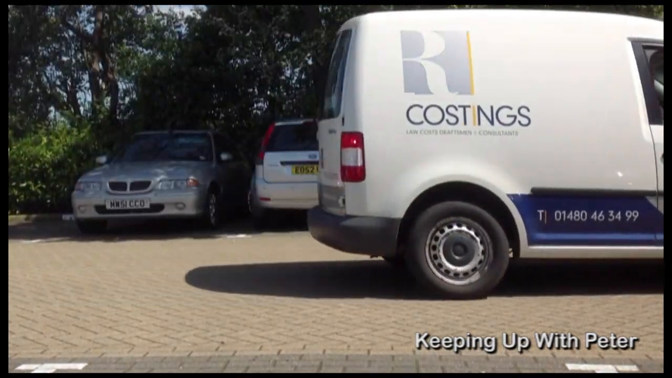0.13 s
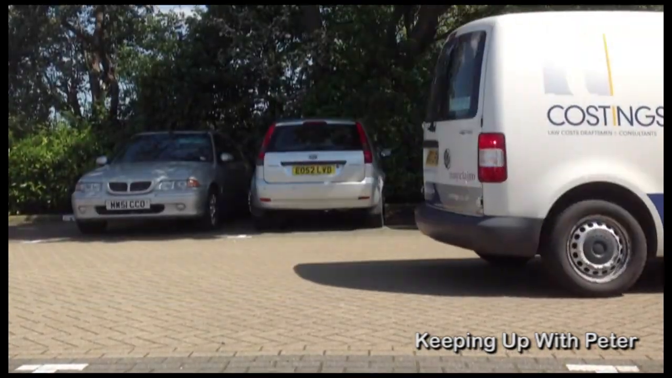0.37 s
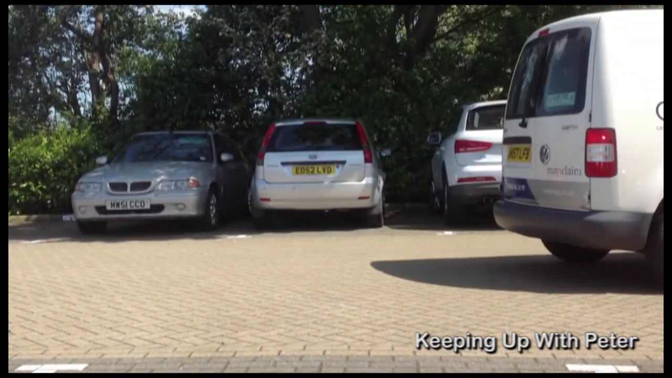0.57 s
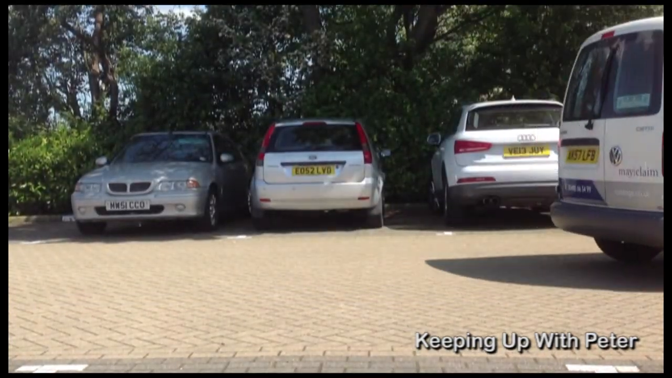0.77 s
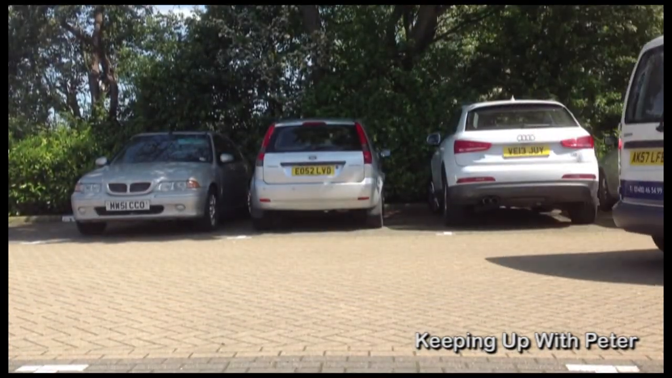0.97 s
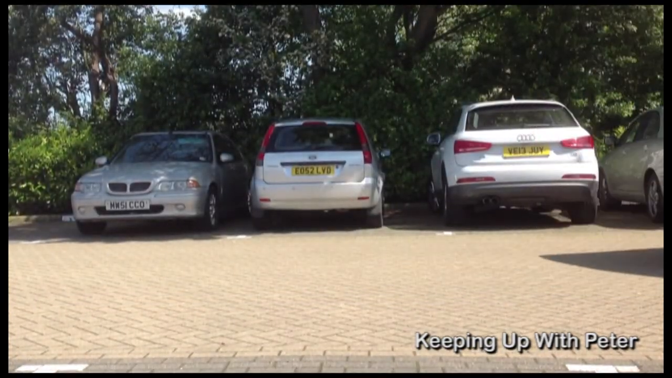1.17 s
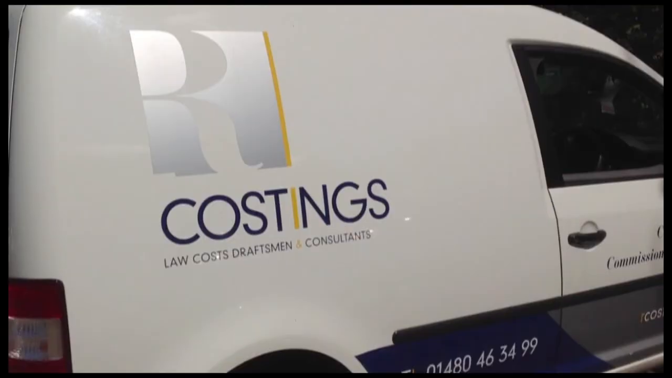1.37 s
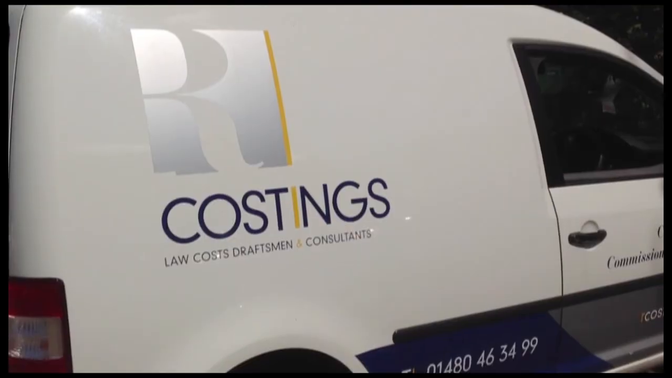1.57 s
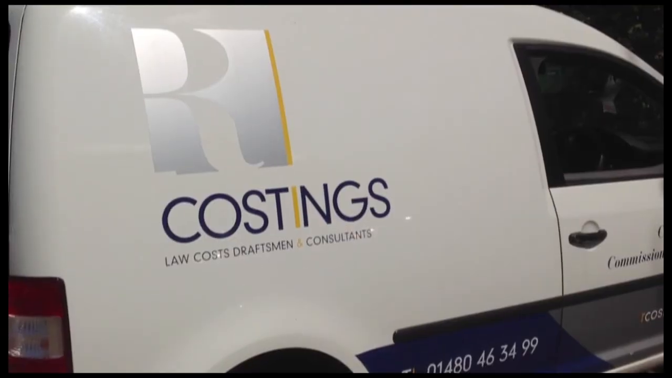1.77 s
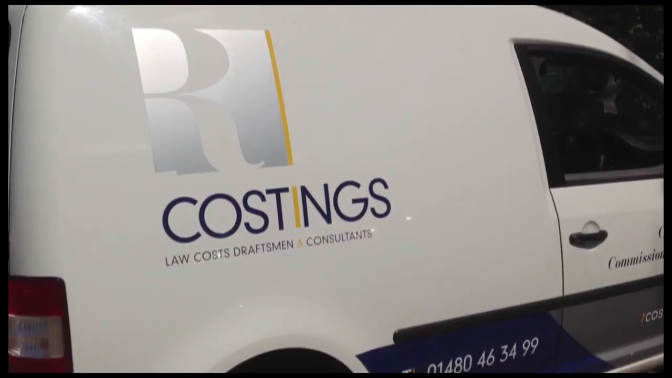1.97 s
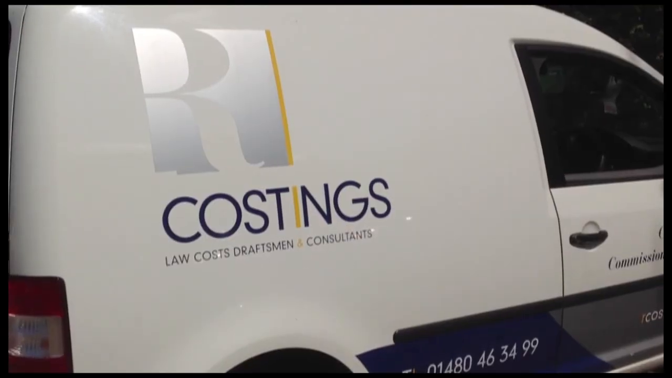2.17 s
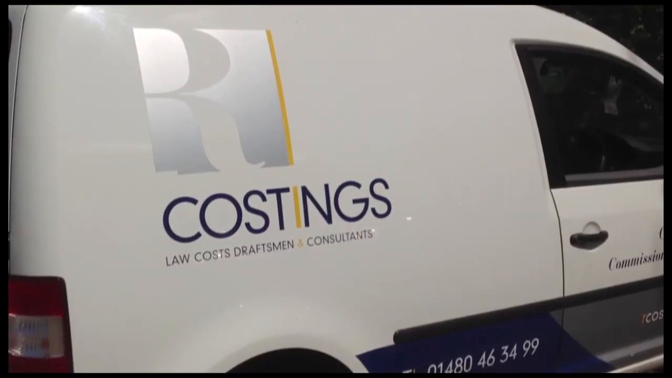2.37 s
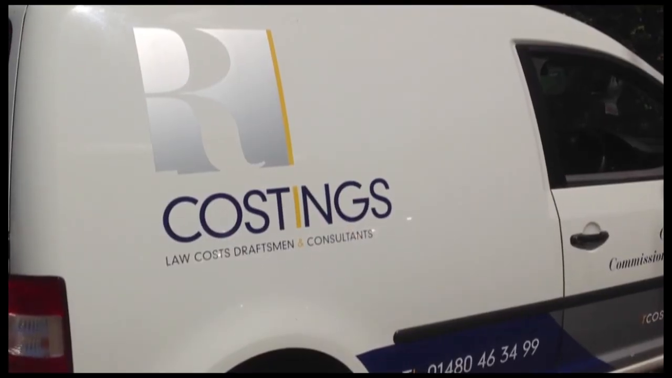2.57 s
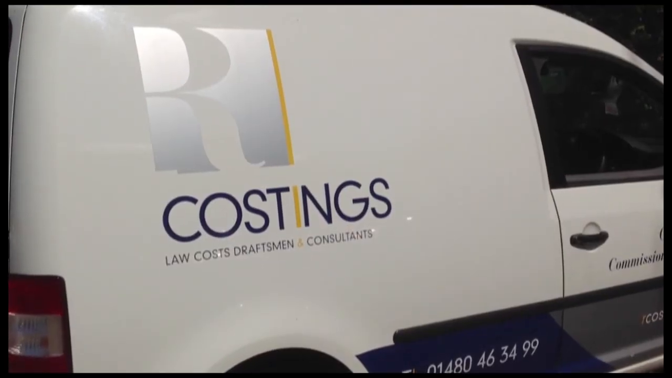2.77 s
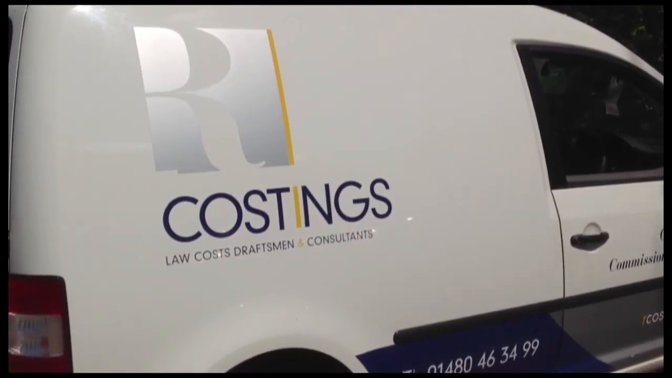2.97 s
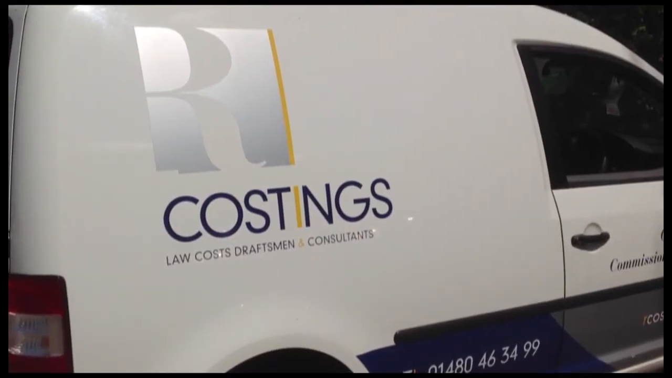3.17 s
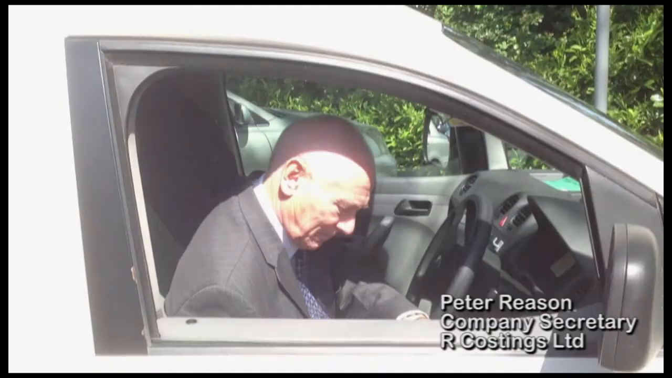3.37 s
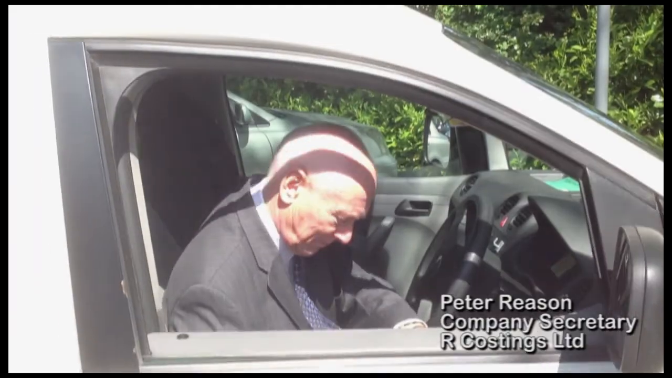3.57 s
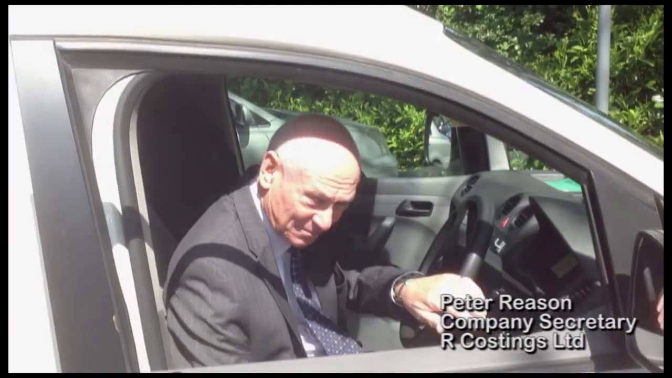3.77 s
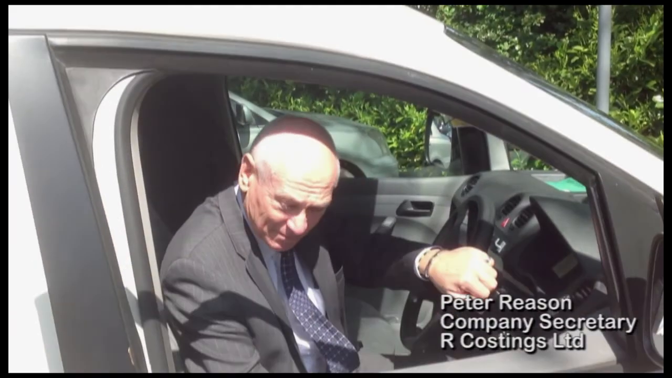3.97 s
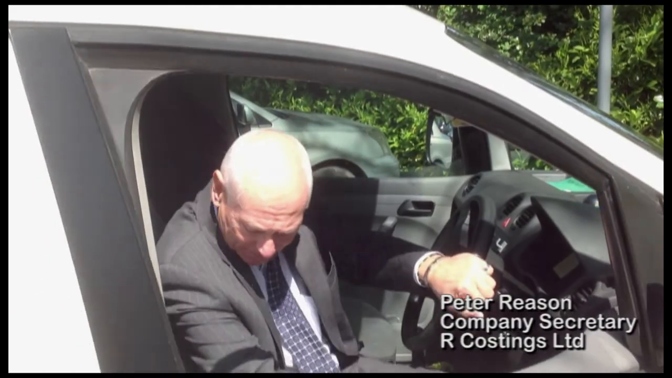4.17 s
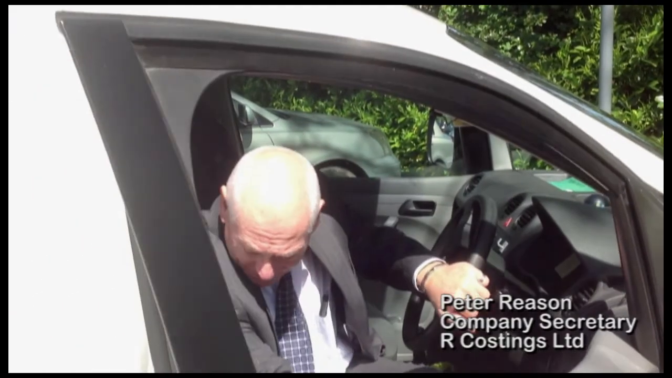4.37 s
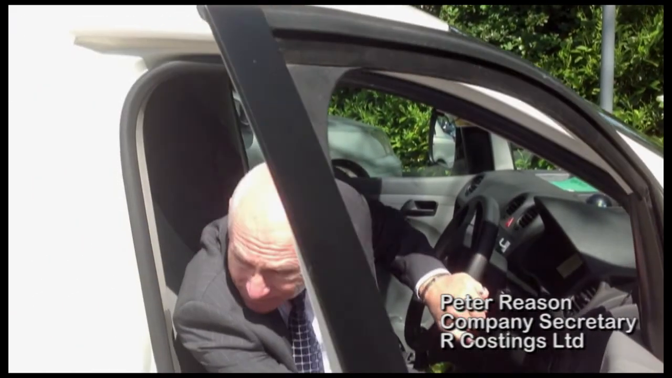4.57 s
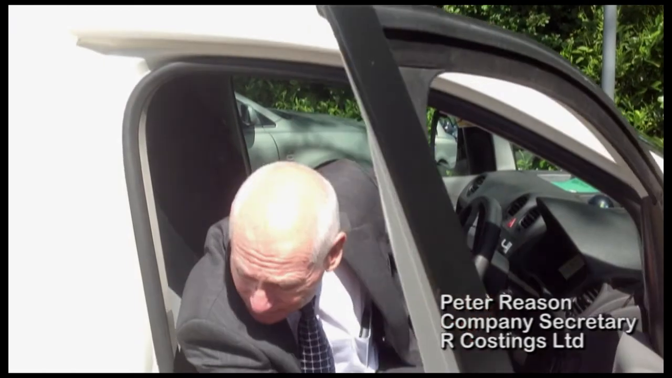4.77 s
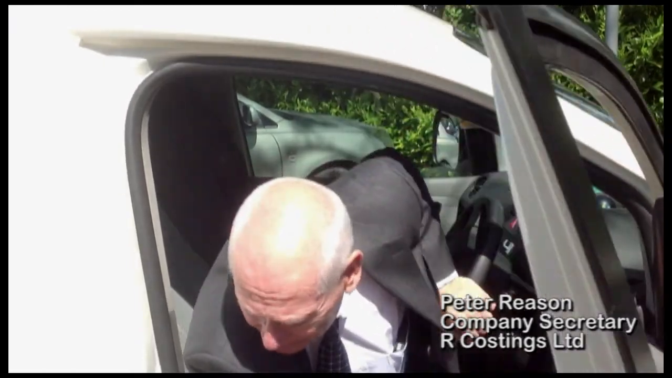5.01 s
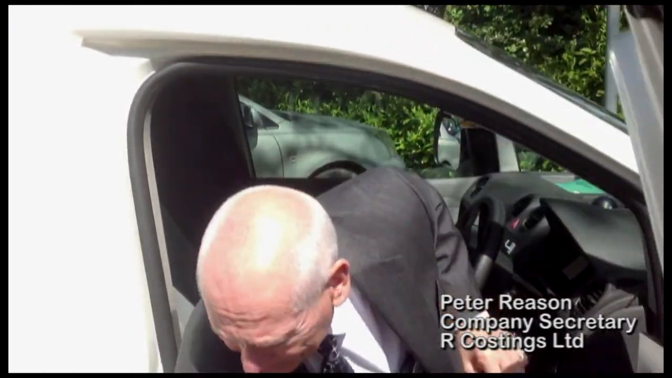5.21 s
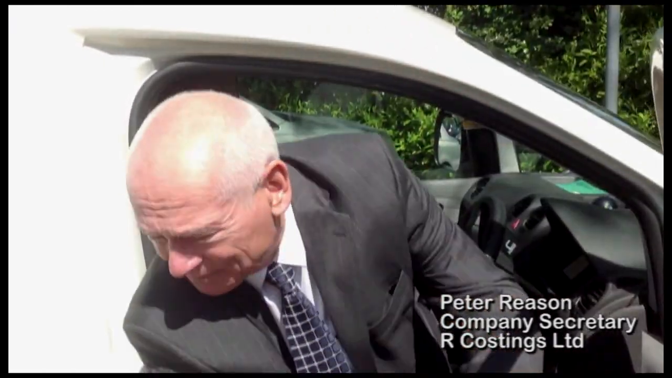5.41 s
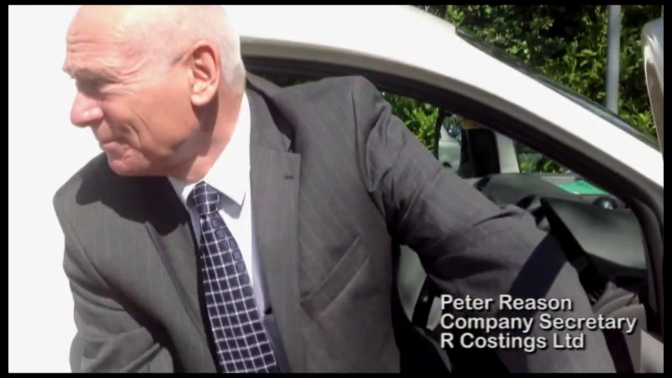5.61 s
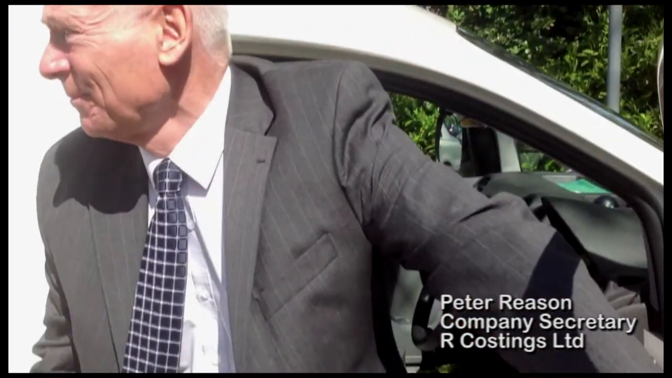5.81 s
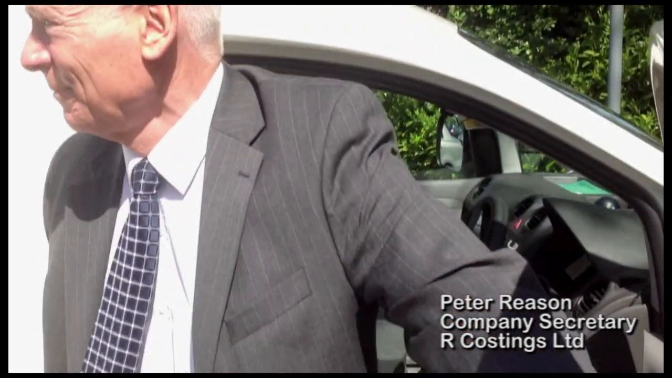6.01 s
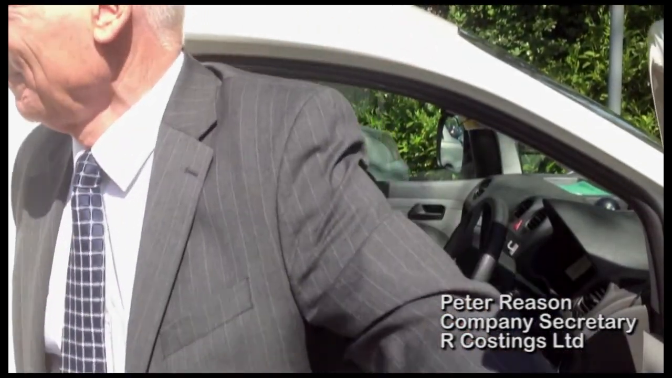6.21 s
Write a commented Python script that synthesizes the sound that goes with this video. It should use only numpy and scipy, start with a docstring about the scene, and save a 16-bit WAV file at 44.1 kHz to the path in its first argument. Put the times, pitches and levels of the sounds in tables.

```python
"""A small four-cylinder diesel van draws away at idle; then, parked, it is heard from its far side and fades.
Noise bursts at each firing excite block and bay resonances, over metallic rings and exhaust boom.
One thin bird note falls in pitch. Close to the cab, cloth rustles as bands of crackling noise,
and the door and its fittings knock, ping and tick as gritty clicks and decaying panel modes.
A filtered-noise outdoor hush lies under the door sounds, with one slow swell."""
import sys
import numpy as np
from scipy import signal
from scipy.fft import rfft, irfft
from scipy.io import wavfile
from scipy.ndimage import uniform_filter1d

SR = 44100
rng = np.random.default_rng(int(sys.argv[2]) if len(sys.argv) > 2 else 0)


def generate_wav(signal):
    """Clip the signal to [-1, 1] and save it as 16-bit WAV at the path in sys.argv[1]."""
    frames = np.transpose(np.atleast_2d(signal))
    scaled = np.clip(frames, -1, 1) * 32767
    pcm = np.round(scaled).astype(np.int16)
    wavfile.write(sys.argv[1], SR, pcm)


N = 275625
TIME = np.arange(N) / SR
CYCLE_S = 0.1447  # four firings
# stretch of the parked idle: first_firing_s, start_s, end_s
PARKED_TIMES = (1.485, 1.34, 3.38)


def gain_of(db):
    """Decibels to amplitude."""
    return 10 ** (np.asarray(db) / 20)


def evened(x):
    """Scales to rms 1."""
    return x / np.sqrt(np.mean(x ** 2) + 1e-20)


def add(mix, start_s, sound):
    """Mixes a sound in at start_s, cut at both ends of the mix."""
    at = int(round(start_s * SR))
    sound = sound[max(-at, 0):]
    part = mix[max(at, 0):][:len(sound)]
    part += sound[:len(part)]


def coloured(x, spectrum):
    """Filters by (Hz, dB) points on a log-frequency axis; rms 1."""
    hz, db = np.transpose(spectrum)
    bins_hz = np.fft.rfftfreq(len(x), 1 / SR)
    curve_db = np.interp(np.log(bins_hz + 1), np.log(hz), db)
    return evened(irfft(rfft(x) * gain_of(curve_db), len(x)))


def resonant(x, modes):
    """The direct sound plus its ringing in (Hz, width Hz, dB) resonances."""
    out = x.copy()
    for hz, width_hz, db in modes:
        b, a = signal.iirpeak(hz, hz / width_hz, fs=SR)
        out += gain_of(db) * signal.lfilter(b, a, x)
    return out


def bell(hz, centre_hz, octaves):
    """A bell-shaped gain on the octave axis."""
    return np.exp(-.5 * (np.log2((hz + 1) / centre_hz) / octaves) ** 2)


def hump(t, half_s):
    """A smooth rise and fall around t = 0."""
    return np.exp(-.5 * (t / half_s) ** 2)


def swell(t, peak_s, order=2):
    """Rises smoothly to 1 at peak_s, then dies away; a higher order gives a shorter hump."""
    u = np.maximum(t, 0) / peak_s
    return (u * np.exp(1 - u)) ** order


def grit(size, centre_hz, octaves, uneven_db):
    """Tiny impacts of uneven strength in one band; rms 1."""
    strength_db = uneven_db * np.clip(rng.standard_normal(size), -2, 2)
    impacts = rng.standard_normal(size) * gain_of(strength_db)
    band = bell(np.fft.rfftfreq(size, 1 / SR), centre_hz, octaves)
    return evened(irfft(rfft(impacts) * band, size))


def firings(times, cylinders):
    """Yields (s, cylinder number) for each firing, evenly spaced but for each cylinder's lateness."""
    first_s, start_s, end_s = times
    count = len(cylinders)
    step_s = CYCLE_S / count
    for k in range(int((start_s - first_s) / step_s) - 2, int((end_s - first_s) / step_s) + 2):
        yield first_s + k * step_s + cylinders[k % count][0], k % count


def clatter(times, cylinders, colour, burst_s, between, alike, ticks_db):
    """Combustion, injectors and valves shake the engine in bursts whose detail partly repeats each cycle."""
    t = np.arange(round(CYCLE_S * SR)) / SR
    power = np.full(N, between ** 2)
    for s, k in firings(times, cylinders):
        stray_db = .6 * rng.standard_normal()
        add(power, s, (gain_of(cylinders[k][1] + stray_db) * swell(t, burst_s)) ** 2)
    repeated = np.resize(rng.standard_normal(len(t)), N)
    shake = np.sqrt(alike) * repeated + np.sqrt(1 - alike) * rng.standard_normal(N)
    # metal ticks about a millisecond long cluster within each burst
    ticks = gain_of(ticks_db * evened(uniform_filter1d(rng.standard_normal(N), size=60)))
    return coloured(shake * ticks * np.sqrt(power), colour)


def boom(times, cylinders, hz, lag_s, peak_s, order):
    """Each exhaust puff swells in the low resonance of the silencer; one cylinder dominates."""
    t, out = np.arange(round(CYCLE_S * SR)) / SR, np.zeros(N)
    for s, k in firings(times, cylinders):
        pitch_hz = hz * (1 + 0.005 * rng.standard_normal())
        level_db = cylinders[k][2] + 0.42 * rng.standard_normal()
        puff = swell(t, peak_s, order) * np.sin(2 * np.pi * pitch_hz * t)
        add(out, s + lag_s, gain_of(level_db) * puff)
    return out


def ring(times, rings, sag_depth, uneven_db):
    """Short metallic block rings return every engine cycle; their pitch may sag once and recover."""
    sag_s, sag_half_s = 0.422, 0.151
    first_s, _, end_s = times
    t, out = np.arange(round(CYCLE_S * SR / 2)) / SR, np.zeros(N)
    phases = rng.random(len(rings))  # in turns
    for s in np.arange(first_s - 2 * CYCLE_S, end_s, CYCLE_S):
        for (lag_s, hz, db, peak_s), phase in zip(rings, phases):
            sag = 1 - sag_depth * hump(s + lag_s - sag_s, sag_half_s)
            pitch_hz = hz * sag * (1 + 0.0021 * rng.standard_normal())
            tone = np.sin(2 * np.pi * (pitch_hz * t + phase))
            level_db = db + uneven_db * rng.standard_normal()
            add(out, s + lag_s, gain_of(level_db) * swell(t, peak_s) * tone)
    return out


def heard(times):
    """1 from start_s to end_s of a stretch, with short ramps."""
    return uniform_filter1d(1. * ((TIME >= times[1]) & (TIME < times[2])), size=200)


def van_passing():
    """The engine draws away at a steady pace, its level falling as 1/distance and its exhaust less steeply."""
    # stretch of the passing idle: first_firing_s, start_s, end_s
    pass_times = (0.053, 0, 1.34)
    # cylinders in firing order: lateness_s, clatter_db, boom_db
    pass_cylinders = [(-0.001, -3, -11), (0.001, -2.5, -8), (-0.0005, -1.5, -1), (-0.0005, -2, -14)]
    # clatter spectrum before the bay resonances: freq_hz, relative_db_per_hz
    pass_colour = [(30, -25), (70, -14.5), (120, 0.5), (250, 4.5), (430, -5.5), (670, -0.5), (950, -8),
                   (1400, -4), (2100, -5), (2500, -7.5), (3300, -11), (5000, -18), (8000, -31),
                   (10500, -58)]
    # block, sump and engine-bay resonances: freq_hz, width_hz, over_direct_db
    pass_bay = [(601, 17, 2), (727, 23, 6), (850, 63, 5.5), (1054, 68, 7.5), (1283, 39, -1.5),
                (1420, 46, -4.5), (1825, 44, 0.5), (2116, 36, -3.5), (2240, 79, -12), (2915, 50, -2.5),
                (3130, 92, 3.5), (3470, 31, -7), (3600, 100, -1.5), (3880, 95, -0.5)]
    # block rings, once a cycle: after_first_firing_s, pitch_hz, relative_db, swell_s
    pass_rings = [(.005, 814, -1, 0.0079), (.043, 810, -2, 0.003), (.075, 845, 6.5, 0.0042),
                  (.078, 1070, 3, 0.0044), (.113, 880, -20, 0.0064)]
    start_m, speed_m_per_s = 4.03, 3.03
    engine_db, exhaust_db, exhaust_loss = -20.5, -8.5, 0.73  # levels at t = 0; exponent of nearness

    bursts = clatter(pass_times, pass_cylinders, pass_colour,
                     burst_s=.009, between=.46, alike=.2, ticks_db=1.3)
    rattle = evened(resonant(bursts, pass_bay))
    block = ring(pass_times, pass_rings, sag_depth=0.243, uneven_db=1.8)
    hiss = gain_of(-13) * grit(N, 6500, .65, uneven_db=4)  # belt and tyres
    exhaust = boom(pass_times, pass_cylinders, hz=188, lag_s=.005, peak_s=.015, order=3)
    nearness = start_m / (start_m + speed_m_per_s * TIME)
    engine = gain_of(2.5) * rattle + gain_of(-2.5) * block + hiss
    body = gain_of(engine_db) * nearness * engine
    tailpipe = gain_of(exhaust_db) * nearness ** exhaust_loss * exhaust
    return heard(pass_times) * (body + tailpipe)


def van_parked():
    """The same idle from behind the van body: quieter, steady, then a linear fade to silence."""
    # cylinders in firing order: lateness_s, clatter_db, boom_db
    parked_cylinders = [(-0.002, -0.03, -4), (-0.003, 0.34, -13.5), (-0.0038, 0.24, -11.5),
                        (-0.001, -0.11, -7)]
    # clatter spectrum before the bay resonances: freq_hz, relative_db_per_hz
    parked_colour = [(30, -28), (70, -8), (130, -1.5), (290, 1.5), (420, -2), (720, 7), (950, -4),
                     (1400, -2.5), (1900, -2), (2600, -5.5), (3500, -9), (4800, -13.5), (7500, -15.5),
                     (10500, -25.5)]
    # block, sump and engine-bay resonances: freq_hz, width_hz, over_direct_db
    parked_bay = [(317, 32, 7), (548, 31, -14.5), (853, 26, 2.5), (1065, 26, 2), (1338, 37, 1.5),
                  (1570, 45, -2), (1744, 31, 2.5), (2006, 90, -4.5), (2510, 63, -4.5), (3080, 80, -6),
                  (3760, 52, 0.5)]
    # block rings, once a cycle: after_first_firing_s, pitch_hz, relative_db, swell_s
    parked_rings = [(0.00242, 764, 1.5, 0.0015), (0.00087, 855, -3.5, 0.0055), (0.0011, 1120, -7, 0.0087),
                    (.039, 736, -6.5, 0.012), (.0705, 1900, -5.5, 0.0044), (.0775, 765, 4, .0033),
                    (.11, 774, -7, 0.0028), (.108, 2900, -10, 0.0037), (.036, 2020, -12, 0.0067),
                    (.1415, 800, -2, 0.0015)]
    level_db, fade_from_s = -38, 2.343

    bursts = clatter(PARKED_TIMES, parked_cylinders, parked_colour,
                     burst_s=0.0057, between=0.55, alike=0.2, ticks_db=0.6)
    rattle = evened(resonant(bursts, parked_bay))
    block = ring(PARKED_TIMES, parked_rings, sag_depth=0, uneven_db=1)
    exhaust = boom(PARKED_TIMES, parked_cylinders, hz=193, lag_s=.001, peak_s=.016, order=5)
    engine = gain_of(-1.5) * rattle + gain_of(7.0) * block + gain_of(8.5) * exhaust
    fade = np.interp(TIME, [fade_from_s, PARKED_TIMES[2]], [1, 0])
    return heard(PARKED_TIMES) * gain_of(level_db) * fade * engine


def bird():
    """One faint whistle: a sine that falls in pitch and wavers at random."""
    start_s, crest_s, level_db = 2.68, 0.097, -59
    start_hz, fall_hz_per_s, waver = 7200, 1750, .025  # waver: rms share of the pitch
    t, out = np.arange(SR // 2) / SR, np.zeros(N)
    wander = evened(uniform_filter1d(rng.standard_normal(len(t)), size=100))
    pitch_hz = (start_hz - fall_hz_per_s * t) * (1 + waver * wander)
    whistle = np.sin(2 * np.pi * np.cumsum(pitch_hz) / SR)
    add(out, start_s, gain_of(level_db) * swell(t, crest_s) * whistle)
    return out


def rustles(clump_db=3):
    """Cloth slides against seat and trim in short crackling swells; narrow bands squeak."""
    # strokes, before the trim resonances: middle_s, level_db, centre_hz, spread_octaves, half_length_s
    strokes = [(3.044, -48.5, 3220, .15, 0.012), (3.043, -55.5, 5500, 0.42, 0.017),
               (4.481, -47.5, 2760, 0.76, 0.0067), (5.073, -56.5, 4370, .8, 0.056),
               (5.164, -42.5, 3800, 0.75, .017), (5.678, -57, 3500, 0.88, 0.15),
               (5.972, -46.5, 2720, 0.95, 0.029), (6.074, -51, 3550, .7, 0.027),
               (6.167, -47, 3570, 0.78, .022)]
    t, out = np.arange(-SR // 3, SR // 3) / SR, np.zeros(N)
    for s, db, hz, octaves, half_s in strokes:
        unevenness = evened(uniform_filter1d(rng.standard_normal(len(t)), size=80))
        clumps = evened(gain_of(clump_db * unevenness))
        crackle = grit(len(t), hz, octaves, uneven_db=5.5)
        add(out, s + t[0], gain_of(db) * hump(t, half_s) * clumps * crackle)
    return out


def click(db, hz, octaves, t60_s, rise_s):
    """A brief gritty contact: quick rise, even decay."""
    t = np.arange(SR // 4) / SR
    shape = np.minimum(t / rise_s, 1) * gain_of(-60 * t / t60_s)
    return gain_of(db) * shape / shape.max() * grit(len(t), hz, octaves, uneven_db=8)


def door(thud_lag_s=0.00298, thud_octaves=1.0):
    """Each knock is a click with one soft rebound, plus the panel's ringing thud; returns both tracks."""
    # door panel: freq_hz, relative_db, t60_s
    panel_modes = [(135, -12, 0.17), (199.5, -1, 0.18), (240.5, 1, 0.16), (300, 4, 0.057), (357, -9, 0.15),
                   (453, -1.5, 0.096), (550, 3.5, 0.069), (613, 4.5, 0.066), (688, 3.5, 0.08),
                   (817, -2, 0.058), (925, -18, 0.04), (1170, -4, 0.05), (1240, -9, 0.047)]
    # knocks of door and trim: start_s, click_db (before trim resonances), click_hz, thud_db, thud_hz
    knocks = [ (3.381, -53, 1490, -33.5, 278), (3.406, -49, 2390, -45, 400), (3.449, -39.5, 1590, -35, 700),
              (3.478, -38.5, 1050, -25.5, 455), (3.689, -24.5, 2300, -17, 242),
              (4.104, -42.5, 1900, -42, 600), (4.362, -37, 1670, -30, 308), (4.508, -35.5, 3930, -35, 500),
              (4.874, -45, 2200, -32.5, 700), (5.696, -50.5, 5500, -35.5, 246),
              (5.839, -32, 2200, -41, 750), (5.877, -39.5, 2980, -47, 700), (5.948, -49, 2500, -40.5, 550)]
    # the brighter the click, the sooner it dies: t60 at reference_hz, power law
    click_octaves, reference_t60_s, reference_hz, damping = 1.14, 0.072, 2000, 0.71
    rebound_s, rebound_db = 0.027, -19

    t, clicks, thuds = np.arange(SR // 4) / SR, np.zeros(N), np.zeros(N)
    hz, db, t60_s = np.transpose(panel_modes)[:, :, None]
    for s, click_db, click_hz, thud_db, thud_hz in knocks:
        click_t60_s = reference_t60_s * (reference_hz / click_hz) ** damping
        for lag_s, softer_db in ((0, 0), (rebound_s, rebound_db)):
            contact = click(click_db + softer_db, click_hz, click_octaves, click_t60_s, rise_s=.0035)
            add(clicks, s + lag_s, contact)
        weight = gain_of(db) * bell(hz, thud_hz, thud_octaves)  # modes near thud_hz ring most
        tones = np.sin(2 * np.pi * (hz * t + rng.random(hz.shape)))
        modes = weight * gain_of(-60 * t / t60_s) * tones
        panel = modes.sum(0) * np.sqrt(2) / np.linalg.norm(weight)
        onset = np.minimum(t * thud_hz, 1)  # one cycle to get moving
        add(thuds, s + thud_lag_s, gain_of(thud_db) * onset * panel)
    return clicks, thuds


def hush():
    """Distant traffic and leaves beside the cab: steady coloured noise with one slow swell."""
    # outdoor spectrum: freq_hz, relative_db_per_hz
    hush_colour = [(30, -44), (55, -13), (90, -24), (120, 0), (240, 0), (320, -4), (500, -0.5), (750, -4.5),
                   (1020, -6.5), (1700, -13), (2500, -15.5), (5000, -24), (10500, -32)]
    level_db, swell_db, crest_s, half_s = -48, 2.6, 4.76, 0.54
    db = level_db + swell_db * hump(TIME - crest_s, half_s)
    return (TIME >= PARKED_TIMES[2]) * gain_of(db) * coloured(rng.standard_normal(N), hush_colour)


def fittings():
    """Small parts in the cab: metal ones ping in a narrow band, others tick dryly as the driver moves."""
    # pings, before the trim resonances: start_s, level_db, pitch_hz
    pings = [(3.691, -29, 3800), (5.869, -36.5, 1710), (5.877, -40, 4300), (5.877, -43, 5450)]
    # ticks, before the trim resonances: start_s, level_db, centre_hz
    dry_ticks = [(4.577, -45, 5000), (5.138, -38, 8500), (5.156, -44, 5500), (5.594, -40, 3800),
                 (5.869, -45, 4500), (6.150, -33, 4000), (6.162, -31, 3750), (6.169, -28.5, 3700),
                 (6.183, -35, 4000)]
    out = np.zeros(N)
    for s, db, hz in pings:
        add(out, s, click(db, hz, octaves=0.065, t60_s=0.059, rise_s=0.0024))
    for s, db, hz in dry_ticks:
        add(out, s, click(db, hz, octaves=.58, t60_s=0.014, rise_s=0.0008))
    return out


def cab(x, t60_s=0.24, wet_db=-14):
    """Sparse, decaying random reflections from the cab and the van's side."""
    t = np.arange(SR // 3) / SR
    sparse = rng.standard_normal(len(t)) * (rng.random(len(t)) < .05)
    taps = sparse * (t > .003) * gain_of(-60 * t / t60_s)
    return x + gain_of(wet_db) * signal.fftconvolve(x, taps / np.linalg.norm(taps))[:N]


def scene():
    """Engine and bird, then door and driver coloured by trim and cab, over the hush."""
    # latch and trim resonances of clicks and rubbing: freq_hz, width_hz, over_direct_db
    trim_modes = [(885, 250, 13), (1260, 59, 2), (1650, 200, 3), (2630, 650, -8.5), (3320, 500, -2.5),
                  (4020, 130, -5), (4270, 130, -13), (5680, 220, -2), (6570, 240, -1), (7340, 180, -2),
                  (9400, 130, 8)]
    clicks, thuds = door()
    trim = gain_of(-3.5) * resonant(clicks + fittings() + rustles(), trim_modes)
    mix = van_passing() + van_parked() + bird() + cab(trim + thuds) + hush()
    return mix[None]


def record(dry):
    """The microphone rolls off the deep bass; a linear-phase low-pass limits the treble."""
    low_hz, edge_hz = 45, 10700
    thin = signal.sosfilt(signal.butter(2, low_hz, "highpass", fs=SR, output="sos"), dry)
    lowpass = signal.firwin(401, edge_hz, window=("kaiser", 8), fs=SR)
    return signal.oaconvolve(thin, lowpass[None], "same")


dry = scene()
out = record(dry)
generate_wav(out)
```